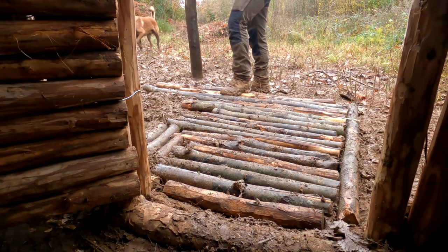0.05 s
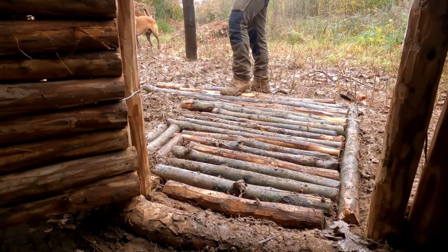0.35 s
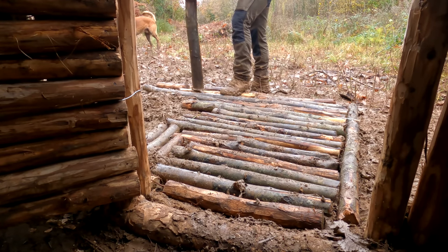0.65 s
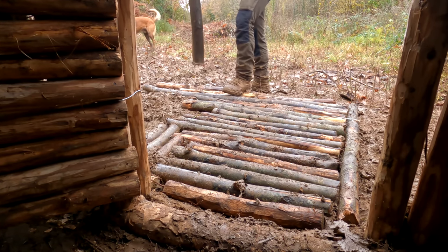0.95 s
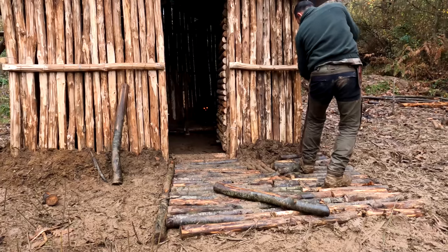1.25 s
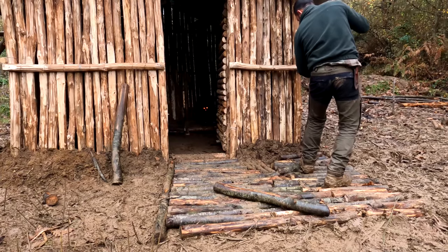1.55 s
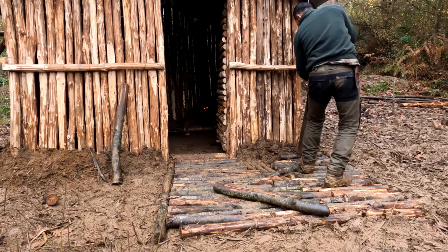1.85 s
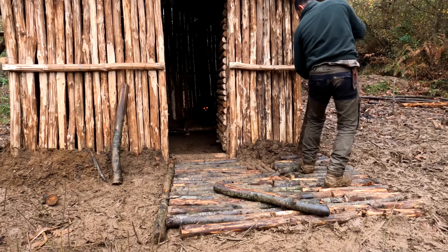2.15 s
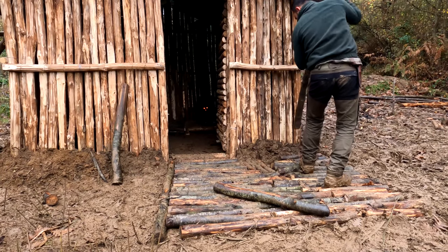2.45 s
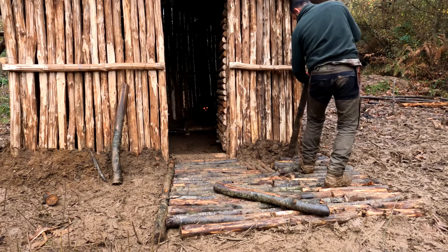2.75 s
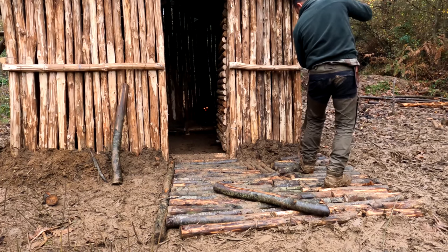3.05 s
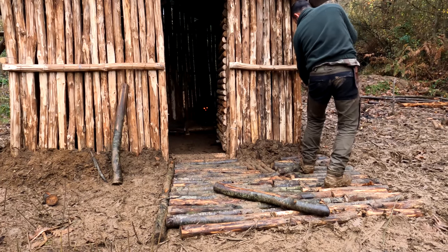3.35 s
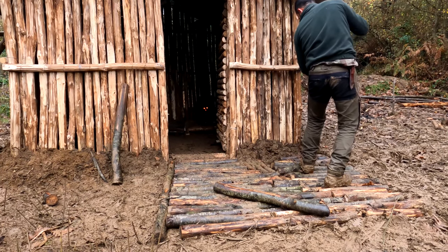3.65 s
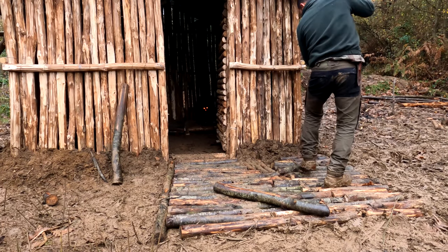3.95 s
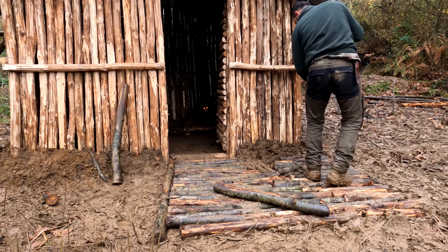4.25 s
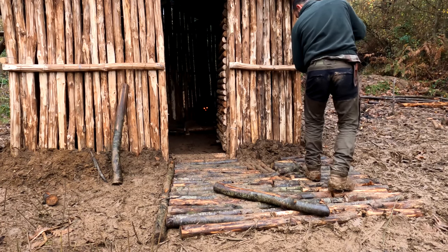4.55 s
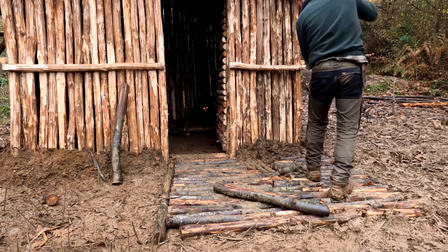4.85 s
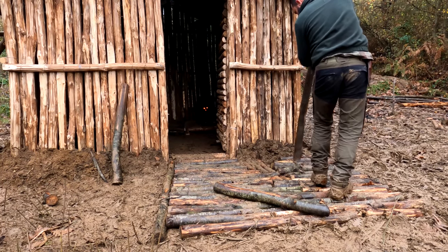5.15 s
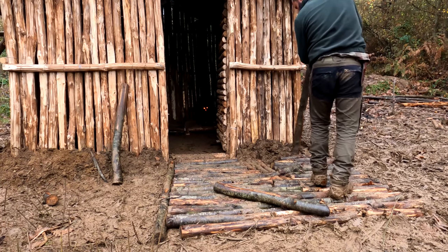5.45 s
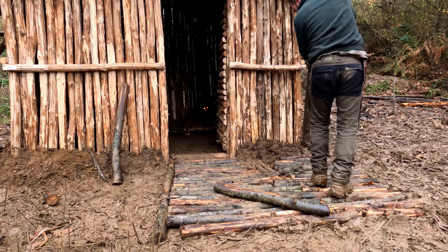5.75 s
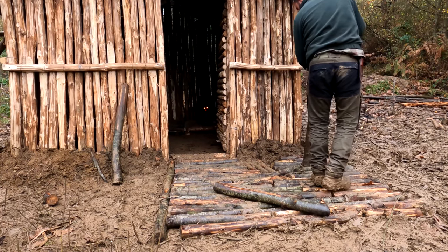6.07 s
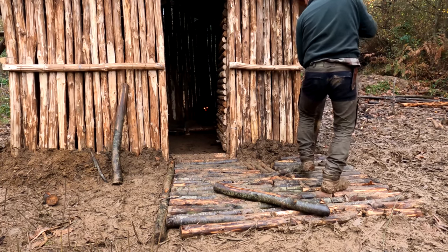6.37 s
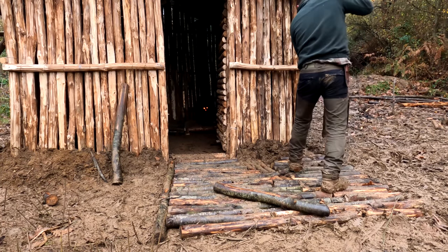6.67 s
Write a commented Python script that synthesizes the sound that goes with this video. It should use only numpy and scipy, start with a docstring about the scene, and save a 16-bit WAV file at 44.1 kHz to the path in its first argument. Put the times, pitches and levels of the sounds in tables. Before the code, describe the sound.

In a quiet forest, a heavy log is rammed end-first against earth and wooden poles about eight times, mostly under a second apart. Each blow is a crack of bark, a wooden knock and a thud, slightly to the right, with a soft echo from the trees. Between blows twigs crunch, soil patters and a few small dry taps land close to the microphone. Faint boot steps follow near the end.

```python
"""First come soft forest air, a fading hollow echo and boots shifting on dead leaves beside a log hut.
Then a heavy log is rammed end-first against earth and wooden poles, again and again. With each blow
bark cracks, wood knocks and the ground thuds; the hut wall scatters the sound and the trees return
a soft echo. Between blows twigs give way, crumbs of soil patter down, a few small dry taps land right
by the microphone and, near the end, boots knock on the floor poles."""
import sys
import numpy as np
from scipy import signal
from scipy.fft import rfft, irfft
from scipy.io import wavfile

SR = 44100
rng = np.random.default_rng(int(sys.argv[2]) if len(sys.argv) > 2 else 0)


def master(y):
    """Save y as 16-bit WAV."""
    cut = np.clip(np.atleast_2d(y).T, -1, 1)
    pcm = np.round(cut * 32767)  # scale
    wavfile.write(sys.argv[1], SR, pcm.astype(np.int16))


N = 304731
TIME = np.arange(N) / SR
AGE = TIME[:SR]  # seconds since a hit

# Levels compare the rows of a table. A fade time (t60) is how long a sound takes to drop by 60 dB.
# The tone of still forest air. Each row: pitch in Hz, level in dB.
AIR_TONE = [(20, -49), (40, -16.5), (65, 2.5), (100, -21.5), (200, -16.5), (350, -28), (700, -31),
            (1200, -29.5), (1800, -33), (3000, -47.5), (7000, -48.5), (15000, -67)]
# How alike left and right are in sound from all around. Each row: pitch in Hz, likeness from 0 to 1.
STEREO_LIKENESS = [(60, 0.995), (300, 0.9), (1000, 0.81), (2500, 0.56), (8000, 0.65), (13000, 0.05)]
# Hollow ringing among the trees. Each row: start in seconds, pitch in Hz, band width in Hz,
# level in dB, fade time in seconds.
HOLLOW_ECHOES = [(0, 906, 407, -46, 0.93), (.667, 970, 217, -29, 0.29), (1.455, 546, 243, -24.5, 0.17),
                 (2.74, 592, 445, -41.5, 0.94), (3.51, 529, 166, -43.5, 0.87), (5.368, 769, 256, -25, 0.1),
                 (5.995, 521, 111, -45, 0.82)]
# Shifts of a boot. Each row: moment of full weight, pressing time and easing time in seconds,
# then leaf rustle and sole scrape in dB.
BOOT_SHIFTS = [(.01, 0.085, 0.25, -72.5, -64.5), (.39, 0.24, 0.071, -82, -89),
               (1.16, 0.25, 0.0085, -74, -75), (3.966, 0.16, 0.15, -71, -67.5),
               (4.83, 0.55, 0.75, -74.5, -69), (5.01, 0.19, .2, -71, -80), (5.291, .05, 0.18, -70, -67.5),
               (6.355, 0.11, 0.13, -65.5, -63), (6.539, .03, 0.23, -74, -82),
               (6.85, 0.073, 0.4, -69, -60.5)]
# Twigs and clods giving way under a boot or the log. Each row: start in seconds, crunch in dB,
# leaf crackle in dB, fade time in seconds.
TWIG_BREAKS = [(0.4576, -51, -63, 0.035), (0.654, -31, -50, 0.037), (2.2116, -46, -50, 0.11),
               (3.4474, -77.5, -61, 0.24), (4.5753, -51.5, -53.5, 0.051), (4.7188, -55.5, -53.5, 0.16),
               (4.801, -44, -58, 0.14), (4.8174, -45, -50.5, 0.1), (4.8552, -44.5, -53, 0.11),
               (4.9751, -47.5, -51.5, 0.039), (6.2867, -88, -47.5, 0.042), (6.631, -45, -49, 0.066),
               (6.822, -45.5, -49, 0.24), (6.894, -57, -45, 0.034)]
# Blows of the log. Each row: start in seconds, strength in dB, then earth, wood, pole, bark and grit
# in dB added to that strength, hardness in dB per octave, thud pitch in Hz, knock pitch in Hz,
# sinking time before the thud in seconds, echo in dB.
LOG_BLOWS = [(0.6647, -14.5, -10, -6, -11.5, -3, -13, 1, 149, 355, 0.002, 2.5),
             (1.45, -13.5, -17, -9.5, -6.5, -14, -26, 1, 194, 486, 0.00756, 3.5),
             (2.0462, -16, -9.5, -4.5, -1.5, -8.5, -27, 2.5, 119, 362, 0.00089, 5),
             (2.7368, -16, -4.5, -1.5, 1.5, -5.5, -21, -1.5, 175, 334, 0.00087, 0.5),
             (3.5084, -15, -13, -8, -7.5, -8, -27.5, 1.5, 188, 543, .0016, 5.5),
             (4.2311, -34.5, -8, -18, -19.5, -3, -5.5, -1, 112, 315, 0.0028, 4),
             (4.303, -13.5, -22, -10, -10, -6, -19.5, 2, 167, 533, 0.0019, 3),
             (4.374, -30, -0.5, -32, -27, -25, -33, 10, 102, 318, 0.0018, -3),
             (5.3348, -28, 11, -10, -16.5, 12.5, 10, 10, 148, 524, 0.0019, 2),
             (5.368, -26, -4, 1, -2, -12, -18, -1, 137, 326.5, 0.0036, 0.5),
             (5.9931, -13.5, -11, -9, -7.5, -9.5, -19, 5, 162, 505, 0.0015, 2.5)]
# The natural notes of the log and poles. Each row: pitch in Hz, level in dB, fade time in seconds.
WOOD_NOTES = [(280.2, -2.5, 0.088), (397, -10.5, 0.1), (567, -6.5, 0.042), (721.4, -16, 0.091),
              (950, -13.5, 0.067), (1190, -3.5, 0.031), (1462, -9, 0.11), (1725, -8, 0.078),
              (2063, -7.5, 0.045), (2736, -8, 0.03), (3750, -11, 0.016), (4980, -8, 0.022),
              (6460, -17.5, 0.046)]
# Echo off the hut and the ground. Each row: pitch in Hz, level in dB, fade time in seconds.
HUT_ECHO = [(50, -5.5, 0.36), (131.6, -17, 0.21), (320, -7, 0.19), (700, -8.5, 0.12), (1500, -12, 0.17),
            (4040, -10.5, 0.15), (10000, -23, 0.33)]
# Echo from the trees. Each row: pitch in Hz, level in dB, fade time in seconds.
TREE_ECHO = [(50, -30, 0.45), (200, -27, 0.46), (500, -31.5, 0.83), (1320, -27, 0.76), (3800, -25, 0.66),
             (10000, -35, 0.3)]
# Soil trickling after a blow. Each row: start in seconds, pitch in Hz, level in dB, fade time in seconds.
SOIL_TRICKLES = [(1.501, 4370, -49, 0.33), (3.558, 4050, -45.5, 0.38)]
# Close dry taps. Each row: start in seconds, level in dB, extra click in dB, left minus right in dB.
CLOSE_TAPS = [(1.5866, -31, 10.5, -10.5), (1.6245, -38, 12, -7), (1.9758, -38.5, 13.5, -9),
              (2.4784, -38.5, 10, -9), (5.6218, -23.5, 4, -11), (6.1485, -37.5, 3.5, -8.5),
              (6.7637, -53, 12.5, -8)]
# A boot set down on the poles. Each row: start in seconds, level in dB.
BOOT_KNOCKS = [(5.222, -41.5), (5.267, -51.5), (6.2753, -45), (6.7843, -47.5)]
# How the work leans to the right. Each row: pitch in Hz, left minus right in dB.
SIDE_BALANCE = [(100, -1), (300, 0), (1000, -3.5), (4000, -2), (8000, -0.9), (13000, 0)]


def undb(db):
    """Turn decibels into a number to multiply a sound by."""
    return 10 ** (np.asarray(db) / 20)


def unit(x):
    """Scale a sound to an average (rms) level of 1."""
    return x / np.sqrt(np.mean(x ** 2))


def at_hz(hz, points, axis=1):
    """Look up a table column at any pitch, sliding between rows on a scale of octaves."""
    points = np.asarray(points, float)
    return np.interp(np.log(hz + 1e-9), np.log(points[:, 0]), points[:, axis])


def band(x, lo_hz, hi_hz, order=2):
    """Keep the part of a sound between two pitches."""
    return signal.sosfilt(signal.butter(order, [lo_hz, min(hi_hz, .48 * SR)], "band", fs=SR, output="sos"), x)


def fade(t60):
    """A one-second curve that drops by 60 dB every t60 seconds."""
    return np.exp(-np.log(1000) * AGE / t60)


def pulse(hz, rise_s):
    """A swing that builds up while two things touch, then dies quickly."""
    return AGE / rise_s * np.exp(1 - AGE / rise_s) * np.sin(2 * np.pi * hz * AGE)


def add(track, start, sound):
    """Mix a sound into a track at a start time in seconds."""
    i = max(int(start * SR), 0)
    track[..., i:i + sound.shape[-1]] += sound[..., :track.shape[-1] - i]


def held(size, count):
    """Random levels, each held for a count of samples."""
    return np.repeat(rng.standard_normal(size // count + 1), count)[:size]


def diffuse(size):
    """Stereo noise from all around: both sides alike in the bass, unrelated in the highest treble."""
    alike = np.clip(at_hz(np.fft.rfftfreq(size, 1 / SR), STEREO_LIKENESS), 0, 1)
    mid, side = rfft(rng.standard_normal((2, size))) * np.sqrt([(1 + alike) / 2, (1 - alike) / 2])
    return irfft(np.array([mid + side, mid - side]), size)


def crackle(lo_hz, hi_hz, t60, rough_db):
    """A short burst of uneven grains of noise."""
    grains = rng.standard_normal(SR) * undb(rough_db * held(SR, count=16))
    return unit(band(grains, lo_hz, hi_hz)) * fade(t60)


def forest_air():
    """Quiet outdoor air swells gently over a low far-off drone."""
    tone = undb(at_hz(np.fft.rfftfreq(N, 1 / SR), AIR_TONE))
    air = unit(irfft(rfft(diffuse(N)) * tone, N))
    swell_db = np.interp(TIME, np.linspace(0, TIME[-1], 30), rng.standard_normal(30))
    drone = unit(band(diffuse(N), 65.2, 71.2, order=3))
    return undb(swell_db - 54.5) * air + undb(-61.5) * drone


def opening_boom(until_s=1.1):
    """For the first second a low boom and a faint hiss lie under the air, then they stop."""
    boom = undb(-58) * unit(band(diffuse(N), 120, 186))
    hiss = undb(-87) * unit(band(diffuse(N), 2000, 11000))
    return (boom + hiss) * (TIME < until_s)


def hollow_echoes():
    """Narrow bands of echo die away among the trunks."""
    out = np.zeros((2, N))
    for start, hz, width, db, t60 in HOLLOW_ECHOES:
        ring = unit(band(diffuse(SR), hz - width / 2, hz + width / 2))
        add(out, start, undb(db) * ring * fade(t60))
    return out


def boots(swell_db=14):
    """Leaves crinkle and soles scrape as the weight comes onto a boot and leaves it again."""
    rustle, scrape = np.zeros((2, N))
    for peak_s, press_s, ease_s, leaf_db, sole_db in BOOT_SHIFTS:
        weight = undb(-swell_db * np.maximum((peak_s - TIME) / press_s, (TIME - peak_s) / ease_s))
        rustle = np.hypot(rustle, undb(leaf_db) * weight)
        scrape = np.hypot(scrape, undb(sole_db) * weight)
    # leaves break in clusters of tiny grains
    grains = undb(3 * rng.exponential(size=N) + 1.5 * held(N, count=192))
    crinkle = band(diffuse(N) * grains, 4300, 7700)
    fizz = band(diffuse(N) * grains, 10000, 13000)
    soles = undb(4) * unit(band(diffuse(N) * grains, 1100, 2150))
    leaves = undb(4.5) * unit(crinkle + 0.26 * fizz) + undb(-0.5) * leaf_snaps()
    return rustle * leaves + scrape * soles


def leaf_snaps(per_second=55):
    """Single dry leaves and stalks snap at random moments, a few louder than the rest."""
    sizes = (rng.random(N) < per_second / SR) * undb(3.7 * rng.standard_normal(N))
    loudness = signal.fftconvolve(sizes, fade(t60=0.033))[:N]
    return unit(loudness * band(diffuse(N), 2600, 6400))


def twigs():
    """A twig or clod gives way with a dull crunch and a crackle of leaves."""
    out = np.zeros(N)
    for start, crunch_db, crackle_db, t60 in TWIG_BREAKS:
        add(out, start, undb(crunch_db - 5.5) * crackle(1020, 1720, t60, rough_db=1))
        add(out, start, undb(crackle_db - 5.5) * crackle(2230, 6530, t60, rough_db=2.5))
    return out


def log_blows():
    """Bark and grit crack first; then the log's weight arrives, the wood rings and the echo follows."""
    direct, echo = np.zeros(N), np.zeros((2, N))
    for start, db, *parts_db, hardness, thud_hz, knock_hz, sink_s, echo_db in LOG_BLOWS:
        earth_db, wood_db, pole_db, bark_db, grit_db = db + np.array(parts_db)
        # How hard the blow drives each pitch. Each pair: pitch in Hz, level in dB.
        drive = [(60, earth_db - 2), (160, db), (286, pole_db), (480, wood_db),
                 (900, wood_level(800, wood_db, hardness)),
                 (1450, wood_level(1450, wood_db, hardness) - 11),
                 (3200, bark_db - 10.5), (7500, grit_db), (16000, grit_db - 28.5)]
        add(direct, start - .002, bark_crunch(bark_db, grit_db))
        add(direct, start, impact(earth_db, db, wood_db, pole_db, hardness, thud_hz, knock_hz, sink_s))
        add(direct, start + .002, wood_ringing(drive))
        add(echo, start, undb(echo_db) * blow_echo(drive))
    return direct, echo


def bark_crunch(bark_db, grit_db, rise_s=0.0033, crumbs_per_second=770):
    """Bark and grit break as the log's end presses in; crumbs go on cracking for a moment."""
    bark = undb(bark_db + 5.5) * crackle(1700, 4800, t60=0.018, rough_db=0.5)
    grit = undb(grit_db + 6.5) * crackle(3100, 10500, t60=0.03114, rough_db=8.5)
    cracks = (rng.random(SR) < crumbs_per_second / SR) * undb(4 * rng.standard_normal(SR))
    crumb_db = (bark_db + grit_db) / 2 - 14
    crumbs = undb(crumb_db) * unit(band(cracks, 2500, 7600, order=1)) * fade(t60=0.1)
    pressing = 1 - np.exp(-(AGE / rise_s) ** 2)
    return pressing * (bark + grit + crumbs)


def wood_level(hz, wood_db, hardness, pivot_hz=440):
    """The wood's level in dB at a pitch: a harder hit lifts the highs and lowers the lows."""
    return wood_db + hardness * np.log2(hz / pivot_hz)


def impact(earth_db, thud_db, wood_db, pole_db, hardness, thud_hz, knock_hz, sink_s):
    """Wood meets wood, the log sinks and thuds, the earth gives and the pole underneath swings on."""
    out = np.zeros(SR)
    snap_hz, clack_hz = 1311, 770
    snap = undb(wood_level(snap_hz, wood_db, hardness) + 2.5) * pulse(snap_hz, rise_s=.00093)
    clack = undb(wood_level(clack_hz, wood_db, hardness) + 6.5) * pulse(clack_hz, rise_s=.00094)
    add(out, .0007, snap + clack)
    add(out, .001, undb(wood_db + 13.5) * pulse(knock_hz, rise_s=.0019))
    add(out, sink_s, -undb(thud_db + 9) * pulse(thud_hz, rise_s=.0017))
    add(out, .006, -undb(earth_db + 2.5) * pulse(hz=76, rise_s=.0038))
    add(out, .008, undb(pole_db - 7.5) * pulse(hz=278.7, rise_s=.0099))
    return out


def wood_ringing(drive):
    """The wood rings at its natural notes; the spot struck varies their level and pitch by chance."""
    out, chance = 0, rng.standard_normal((len(WOOD_NOTES), 2))
    for k, ((hz, db, t60), (spot, detune)) in enumerate(zip(WOOD_NOTES, chance)):
        swing = np.sin(2 * np.pi * hz * (1 + 0.019 * detune) * AGE) * fade(t60)
        level = undb(at_hz(hz, drive) + db + 2 * spot + 7)
        out = out + (-1) ** k * level * swing  # every second note starts the other way
    return out


def blow_echo(drive, hut_build_s=.008, trees_build_s=.04):
    """Countless reflections of one blow come early off the hut and linger among the trees."""
    spectrum = rfft(diffuse(SR) * undb(0.81 * held(SR, count=64)))  # some reflections stand out
    octave = np.log2(np.fft.rfftfreq(SR, 1 / SR) + 1e-9)
    hut_rise = 1 - np.exp(-(AGE / hut_build_s) ** 2)
    trees_rise = 1 - np.exp(-(AGE / trees_build_s) ** 2)
    out = 0
    for hz in np.geomspace(31.25, 16000, 10):  # each octave fades at its own speed
        window = np.clip(1 - abs(octave - np.log2(hz)), 0, 1)
        noise = unit(irfft(spectrum * window, SR))
        hut = hut_rise * undb(at_hz(hz, HUT_ECHO)) * fade(at_hz(hz, HUT_ECHO, axis=2))
        trees = trees_rise * undb(at_hz(hz, TREE_ECHO)) * fade(at_hz(hz, TREE_ECHO, axis=2))
        out = out + noise * undb(at_hz(hz, drive)) * np.hypot(hut, trees)
    return out


def falling_soil():
    """Crumbs of earth thrown up by a blow patter back on the leaves."""
    out = np.zeros(N)
    landing = 1 - fade(t60=0.42)  # the crumbs take a moment to come down
    for start, hz, db, t60 in SOIL_TRICKLES:
        add(out, start, undb(db) * landing * crackle(hz / 1.36, hz * 1.26, t60, rough_db=1.5))
    return out


def close_taps():
    """Something small lands by the microphone: a click, a pat and a soft thump, too close to echo."""
    out = np.zeros((2, N))
    click = undb(3) * band(signal.unit_impulse(SR), 1300, 6070)
    pat = undb(9.5) * pulse(hz=326, rise_s=.00036)
    thump = undb(7.5) * (pulse(hz=146, rise_s=.0012) + 0.31 * pulse(hz=58, rise_s=.005))
    for start, db, click_db, pan_db in CLOSE_TAPS:
        left_right = undb([[db + pan_db / 2], [db - pan_db / 2]])
        add(out, start, left_right * (undb(click_db) * click + pat + thump))
    return out


def boot_knocks():
    """A boot comes down on the floor poles with a soft, dull knock."""
    out = np.zeros(N)
    knock = pulse(hz=413, rise_s=.00186) + undb(0.5) * pulse(hz=244, rise_s=.0038)
    thud = undb(4.5) * pulse(hz=125.8, rise_s=.0029)
    for start, db in BOOT_KNOCKS:
        add(out, start, undb(db) * (knock + thud))
    return out


def from_the_right(x, lag_s=1.7e-5):
    """Sound from a little to the right reaches the microphone's left side later and softer."""
    hz = np.fft.rfftfreq(N, 1 / SR)
    lean = undb(at_hz(hz, SIDE_BALANCE) / 2) * np.exp(-1j * np.pi * hz * lag_s)
    return irfft(rfft(x) * np.array([lean, 1 / lean]), N)


def scene():
    """Mix the work and its echoes with the close taps, the boots and the forest."""
    blows, echo = log_blows()
    work = from_the_right(blows + twigs() + falling_soil() + boot_knocks())
    return work + echo + close_taps() + boots() + hollow_echoes() + forest_air() + opening_boom()


def record(dry):
    """The microphone loses the deepest bass and the highest treble and rounds the tallest peaks."""
    sound = signal.sosfilt(signal.butter(2, 28, "high", fs=SR, output="sos"), dry)
    rounded = np.tanh(sound)
    softened = signal.sosfilt(signal.butter(5, 14000, fs=SR, output="sos"), rounded)
    return signal.sosfilt(signal.ellip(8, .2, 70, 15800, fs=SR, output="sos"), softened)


dry = scene()
out = record(dry)
master(out)
```